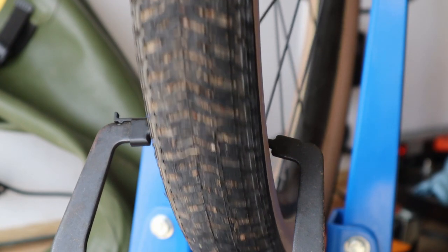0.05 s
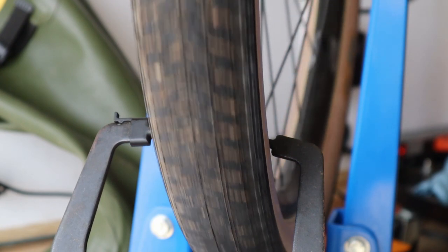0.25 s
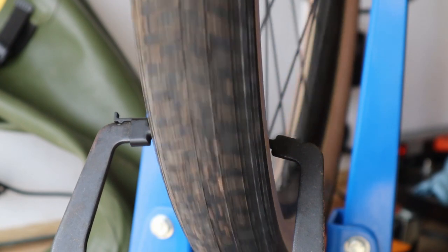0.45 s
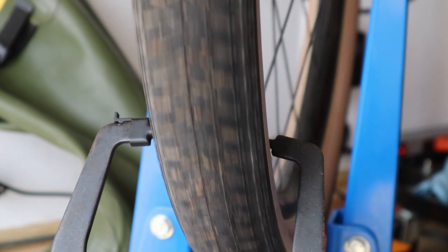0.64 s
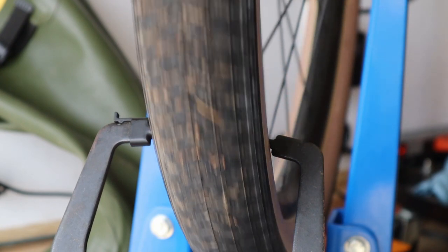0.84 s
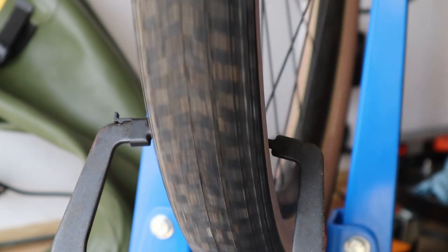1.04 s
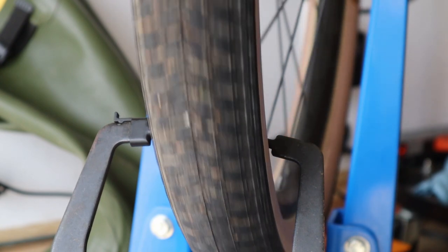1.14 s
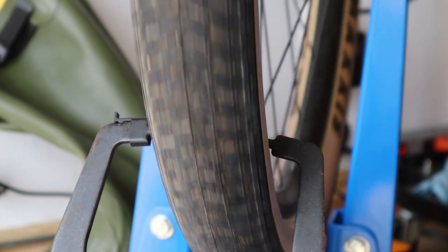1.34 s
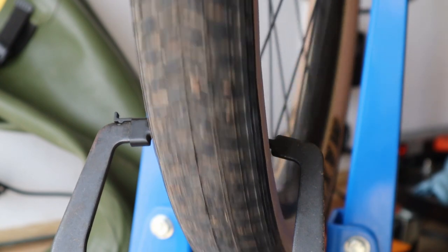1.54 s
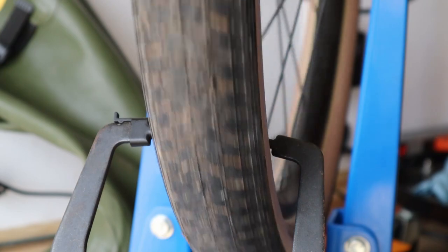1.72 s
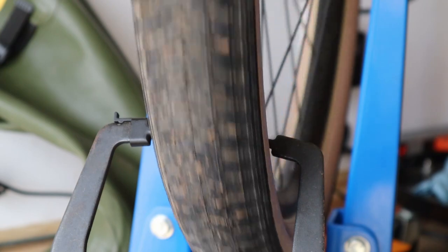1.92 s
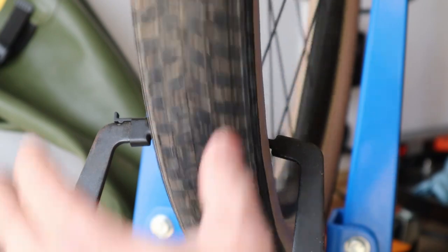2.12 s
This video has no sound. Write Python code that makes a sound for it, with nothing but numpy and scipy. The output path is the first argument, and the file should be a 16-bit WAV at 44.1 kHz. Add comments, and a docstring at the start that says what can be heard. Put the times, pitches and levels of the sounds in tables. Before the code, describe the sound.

Two ringing metal scrapes, one long and one short, from a turning bicycle wheel's rim.

```python
"""A workshop, the microphone close to a truing stand; far traffic hums and a bird chirps outside.
A spinning bicycle rim, out of true, grazes the steel caliper, ticks, then rasps in a long rub:
tiny slips shake the caliper arm and the rim, and the stand rings low as it takes the load.
The bird whistles again. One turn after the first rub comes a shorter one; rim and arm ring on."""
import sys
import numpy as np
from scipy import signal
from scipy.fft import rfft, irfft, next_fast_len
from scipy.io import wavfile
from scipy.ndimage import uniform_filter1d, minimum_filter1d, map_coordinates

SR = 44100
rng = np.random.default_rng(int(sys.argv[2]) if len(sys.argv) > 2 else 0)


def wav_record(signal):
    """Record a signal, one row per channel, as 16-bit PCM in the file named by sys.argv[1]."""
    frames = np.transpose(np.atleast_2d(signal))
    bounded = np.clip(frames, -1, 1)
    # unit amplitude maps onto the largest positive 16-bit level
    quanta = np.round(bounded * 32767).astype(np.int16)
    wavfile.write(sys.argv[1], SR, quanta)


N = 95785


def amp(db):
    """Decibels to gain."""
    return 10 ** (np.asarray(db) / 20)


def unit(x):
    """Scale to rms 1."""
    return x / np.sqrt(np.mean(x ** 2) + 1e-20)


def along(points, hz):
    """Interpolate (freq_hz, value) points on a log frequency axis."""
    freqs, values = np.transpose(points)
    return np.interp(np.log(hz + 1), np.log(freqs + 1), values)


def curves(rows):
    """Each column after time_s, sample by sample, then a gate that is 1 inside the table's span."""
    times, *columns = np.transpose(rows)
    t = np.arange(N) / SR
    return [np.interp(t, times, c) for c in columns] + [(t >= times[0]) & (t <= times[-1])]


def wobble(knots_per_s):
    """A smooth random curve."""
    knots = rng.standard_normal(int(N * knots_per_s / SR) + 4)
    return map_coordinates(knots, [np.arange(N) * knots_per_s / SR])


def filtered(x, response):
    """Pass x through a complex response of frequency."""
    size = next_fast_len(N + SR)
    return irfft(rfft(x, size) * response(np.fft.rfftfreq(size, 1 / SR)), size)[:N]


def resonances(modes):
    """Response of (pitch_hz, width_hz, gain_db) modes of alternating sign."""
    return lambda f: sum((-1) ** k * amp(db) * 1j * f * width / (hz * hz - f * f + 1j * f * width)
                         for k, (hz, width, db) in enumerate(modes))


def minimum_phase(spectrum):
    """Causal response with the colour of (freq_hz, level_db) points."""
    def response(f):
        cepstrum = irfft(np.log(amp(along(spectrum, f)) + 1e-6))
        half = len(cepstrum) // 2
        cepstrum[1:half] *= 2
        cepstrum[half + 1:] = 0
        return np.exp(rfft(cepstrum))[:len(f)]
    return response


def echo(x, decays):
    """Diffuse reflections dying away as the (freq_hz, t60_s) points say."""
    hz, t, noise = signal.stft(rng.standard_normal(SR), SR, nperseg=256)
    fade = amp(-60 * t / along(decays, hz)[:, None])
    tail = signal.istft(noise * fade, SR, nperseg=256)[1]
    return signal.fftconvolve(x, tail / np.linalg.norm(tail))[:N]


# Far traffic and microphone hiss: freq_hz, relative_db
TRAFFIC_SPECTRUM = [(15, -48.5), (30, -21), (60, -10), (100, -6), (200, -4.5), (283, -4.5), (340, -12.5),
                    (413, -5.5), (586, -4), (800, -5.5), (1090, 1), (1350, -6), (1800, -13.5),
                    (2510, -18.5), (3500, -22.5), (6000, -28), (15700, -29)]
# Low tones that come and go: start_s, end_s, pitch_hz, relative_db
TRAFFIC_HUMS = [(0.21, 0.53, 176, -50.5), (0.73, 1.15, 246, -54.5), (0.89, 1.45, 197, -57),
                (.4, 2.26, 105, -61)]

def traffic(noise_db=-47):
    """Far traffic over the microphone's hiss: patchy broad noise and wavering low tones."""
    cells = signal.stft(rng.standard_normal(N + 512), nperseg=512)[2]
    patches = uniform_filter1d(rng.standard_normal(cells.shape), 5, axis=0)
    patches = uniform_filter1d(patches, 12, axis=1)
    noise = signal.istft(cells * amp(0.4 * unit(patches)), nperseg=512)[1][:N]
    out = amp(noise_db) * unit(filtered(noise, lambda f: amp(along(TRAFFIC_SPECTRUM, f))))
    t = np.arange(N) / SR
    for start_s, end_s, hz, db in TRAFFIC_HUMS:
        progress = np.clip((t - start_s) / (end_s - start_s), 0, 1)
        swell = np.sqrt(np.sin(np.pi * progress).clip(0))
        level = swell * amp(db + 1 + 1.5 * wobble(18))
        pitch_hz = hz * (1 + .012 * wobble(9.56))
        out += level * np.sin(2 * np.pi * np.cumsum(pitch_hz) / SR)
    return out


# Rim on caliper, one list a pass; the last three columns are relative to the level:
# time_s, level_db, body_db, squeal_db, sheen_db
CONTACTS = [
    [(0, -48, -10.5, -4, -4), (.1, -60, -10, -3.5, -2.5), (.3, -57, -14.5, -4, 7.5),
     (.335, -38.5, -16.5, -10, 7.5), (.365, -38, -18, -9, 10.5), (.42, -56.5, -14, -5, 8),
     (.4445, -65.5, -8, 1, 3), (.446, -28, -8, 1, 6.5), (.451, -23, -4, -4.5, -0.5),
     (.4695, -45, 5.5, -2, 6.5), (.472, -21, 4.5, -11, 9), (.482, -21, -0.5, 0, 4),
     (.494, -11.5, 0, -14.5, -0.5), (.518, -10.5, 2, -3, 1.5), (.56, -11, -5, 7, 0),
     (.6, -11.5, -0.5, 9, 0.5), (.615, -13, -2, 0.5, -2.5), (.7, -14, 2, -3.5, 0), (.8, -15, 1, 2, 2),
     (.87, -16, 1.5, 2.5, -0.5), (.934, -14, 0, -6.5, 1), (.955, -21.5, 6, 6, -12), (.965, -70, 2, -6, -3)],
    [(1.695, -64, -13, 4, 1), (1.713, -30, -18, 2, 2), (1.717, -23.5, 2.5, -4, -1), (1.733, -16, 2, 3, 0.5),
     (1.748, -11.5, 3.5, -1, 1.5), (1.794, -13, 0.5, 4, 1), (1.82, -12.5, -0.5, 1.5, 6),
     (1.86, -13, 1.5, 0, 0.5), (1.928, -14, -0.5, -5.5, 3), (1.955, -18.5, -2, -24, 1.5),
     (1.965, -51, -3, -20, -2)],
]

def rim_friction(slips_per_s=8000, spread_db=2.5, flutter_db=.8):
    """Tiny uneven slips of rim on caliper; returns their force and the hiss of the treble sheen."""
    slips = (rng.random(N) < slips_per_s / SR) * rng.standard_normal(N)
    slips *= amp(spread_db * rng.standard_normal(N))
    slips = unit(slips * amp(flutter_db * wobble(40)))
    level, sheen, body_boost, squeal_boost = np.zeros((4, N))
    for rows in CONTACTS:
        level_db, body_db, squeal_db, sheen_db, touching = curves(rows)
        level += touching * amp(level_db)
        sheen += touching * amp(level_db + sheen_db)
        body_boost += touching * (amp(body_db) - 1)
        squeal_boost += touching * (amp(squeal_db) - 1)
    force = level * slips
    body_top_hz, squeal_hz, width_hz = 1640, 2570, 220
    body = filtered(force * body_boost, lambda f: 1 / (1 + (f / body_top_hz) ** 4))
    squeal = filtered(force * squeal_boost, lambda f: 1 / (1 + (2 * (f - squeal_hz) / width_hz) ** 2))
    return force + body + squeal, sheen * rng.standard_normal(N)


# Caliper arm, damped by the touch: pitch_hz, width_hz, gain_db
ARM_MODES = [(504, 64, -24.5), (729, 28.5, -14.5), (925.2, 25.6, -3.5), (1116.4, 20.4, -6.5),
             (1343, 34.4, 1.5), (1413, 50, -9.5), (1702, 46, -11), (1834, 33, -2), (2093, 23, -13.5),
             (2188, 10, 2.5), (2335, 15, -1), (2496, 35, 3.5), (2592, 58, -7.5), (2996, 44.3, 0.5),
             (3126, 53, -10.5), (3266, 18, -10.5), (3360, 48, -6.5), (3686, 15, -18.5), (3964, 62, -22),
             (4078, 210, -20.5), (4740, 65, -18), (4965, 49, -23)]
# Broad colour of the rub: freq_hz, relative_db
RASP_SPECTRUM = [(200, -60.5), (330, -58), (500, -35), (620, -32), (800, -15), (1020, -25), (1230, -20),
                 (1500, -6.5), (2000, -7), (2410, -0.5), (2700, -11.5), (3150, -3), (3400, -8), (3700, -19),
                 (4150, -14.5), (4450, -15.5), (5200, -31), (6500, -44), (8600, -60.5), (9000, -84.5),
                 (14000, -84.5)]
# Rim ringing freely: pitch_hz, gain_db, t60_s
RIM_MODES = [(806, -9, .45), (824, -9, .4), (1640, -5, .55), (1846, -11, .3), (1970, -10, .3),
             (2204, -7, .4), (2241, -10, .4), (2350, -9, .4), (2427, -10, .45), (2466, -5, .5),
             (2507, -6, .45), (2752, -12, .45), (2859, -8, .45), (2942, -12, .5)]
# High modes of the caliper tip: pitch_hz, width_hz, gain_db
TIP_MODES = [(5276, 91, 3.5), (5800, 250, -3.5), (6120, 110, -5), (6570, 90, -2.5), (7120, 45, -5),
             (7440, 150, -8), (7830, 250, -7.5), (8380, 160, -12.5), (10200, 250, -22.5),
             (11020, 300, -20.5), (11600, 300, -21)]

def rim_rub(patch_hz=5640):
    """Close to the microphone, friction rasps and sets the arm, the rim and the caliper tip ringing."""
    def through_patch(modes):
        """The contact patch dulls the modes above patch_hz."""
        return lambda f: resonances(modes)(f) / (1 + 1j * f / patch_hz - (f / patch_hz) ** 2) ** 2

    force, hiss = rim_friction()
    rim_modes = [(hz, np.log(1000) / np.pi / t60_s, db) for hz, db, t60_s in RIM_MODES]
    paths = [(force, through_patch(ARM_MODES), -2.5),
             (force, minimum_phase(RASP_SPECTRUM), -4.5),
             (force, through_patch(rim_modes), -14.5),
             (hiss, resonances(TIP_MODES), -32.5)]
    freqs = np.fft.rfftfreq(SR, 1 / SR)
    out = np.zeros(N)
    for drive, response, gain_db in paths:
        rms_gain = np.sqrt(np.mean(np.abs(response(freqs)) ** 2))
        out += amp(gain_db) * filtered(drive, response) / rms_gain
    return out


# Whistles, one list a note: time_s, pitch_hz, relative_db
BIRD_NOTES = [
    [(.005, 2530, -70.5), (.025, 2520, -59.5), (.06, 2570, -72.5)],
    [(.04, 3300, -48.5), (.052, 3300, -74), (.075, 3350, -79)],
    [(.129, 4250, -63), (.133, 4070, -47), (.136, 3300, -55.5), (.139, 3000, -67)],
    [(1.415, 2850, -70), (1.428, 3230, -52.5), (1.438, 3535, -48.5), (1.449, 3780, -49.5),
     (1.464, 3470, -42), (1.485, 3336, -56), (1.53, 3010, -54.5), (1.58, 2763, -57.5), (1.62, 2656, -53.5),
     (1.66, 2585, -61), (1.71, 2490, -62.5)],
    [(1.426, 3750, -71), (1.437, 3980, -52), (1.448, 4080, -56), (1.465, 4000, -58)],
]
# Long echo outdoors: freq_hz, t60_s
OUTDOOR_DECAY = [(2000, .9), (5000, 1.1)]

def bird():
    """Rough whistles from far outside, blurred by nearby walls and a long echo."""
    song = np.zeros(N)
    for rows in BIRD_NOTES:
        hz, db, singing = curves(rows)
        level = singing * amp(db + 2.5 * wobble(90))
        pitch_hz = hz * (1 + .006 * wobble(200))
        song += level * np.sin(2 * np.pi * np.cumsum(pitch_hz) / SR)
    walls = echo(song, decays=[(2000, .15), (5000, .085)])
    return amp(3.5) * song + walls + amp(-3) * echo(song, OUTDOOR_DECAY)


# The stand takes the load: start_s, gain_db
LOAD_KNOCKS = [(.49, -39.5), (1.724, -36.5), (1.82, -38.5), (1.861, -42), (1.93, -40)]
# Frame of the stand: pitch_hz, gain_db, t60_s
STAND_MODES = [(249, -4.5, 0.37), (493.7, 14.5, 0.097)]

def stand_ring(rise_s=.015):
    """Close by, the frame of the stand rings low each time the load comes on."""
    t = np.arange(SR // 2) / SR
    ring = sum(amp(db - 60 * t / t60_s) * np.sin(2 * np.pi * hz * t) for hz, db, t60_s in STAND_MODES)
    ring *= 1 - np.exp(-t / rise_s)
    out = np.zeros(N + SR)
    for start_s, gain_db in LOAD_KNOCKS:
        out[round(start_s * SR):][:len(t)] += amp(gain_db) * ring
    return out[:N]


# Reverberation of the workshop: freq_hz, t60_s
WORKSHOP_DECAY = [(300, 0.57), (2000, 0.56), (5000, 0.48), (10000, 0.26)]

def scene():
    """One microphone: the stand up close, the workshop around it, bird and traffic far outside."""
    near = rim_rub() + stand_ring()
    workshop = amp(-11.5) * echo(near, WORKSHOP_DECAY)
    return (near + workshop + bird() + traffic())[None]


def record(dry, ceiling=.96, top_hz=15780):
    """Behind the microphone, a gentle limiter rides rare peaks and all above top_hz is cut."""
    needed_gain = np.minimum(1, ceiling / (np.abs(dry[0]) + 1e-9))
    held_gain = minimum_filter1d(needed_gain, size=441)
    gain = uniform_filter1d(held_gain, size=221)
    return filtered(dry[0] * gain, lambda hz: hz < top_hz)[None]


dry = scene()
out = record(dry)
wav_record(out)
```